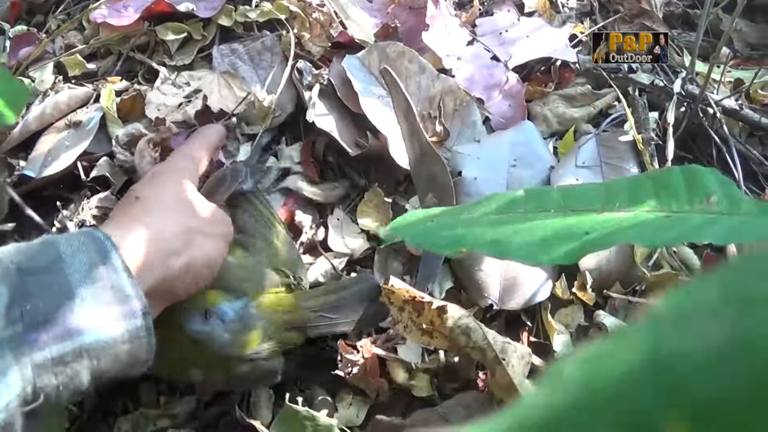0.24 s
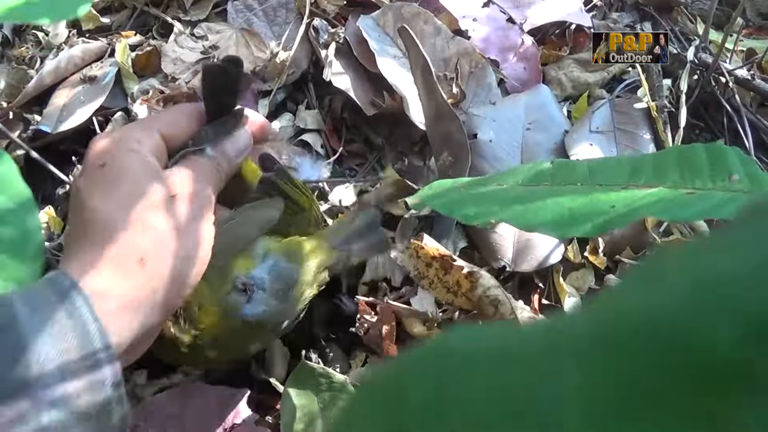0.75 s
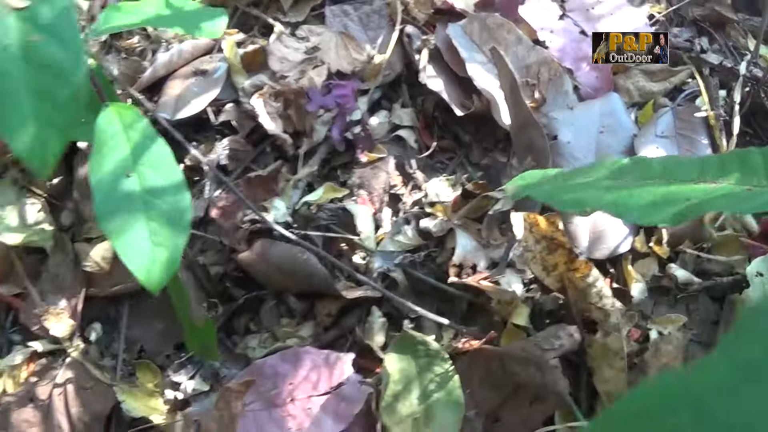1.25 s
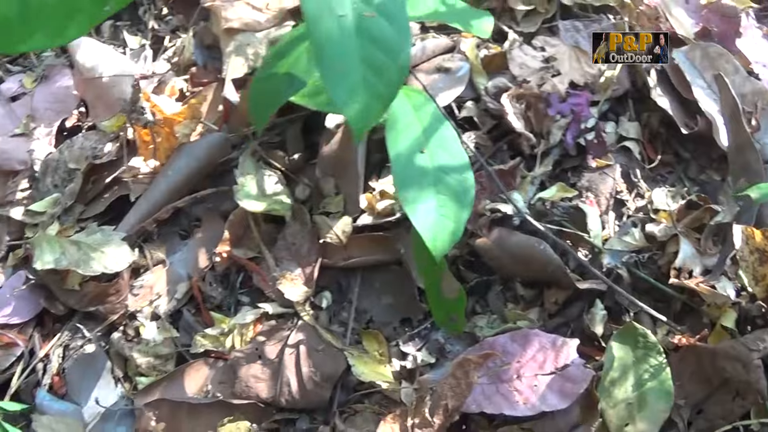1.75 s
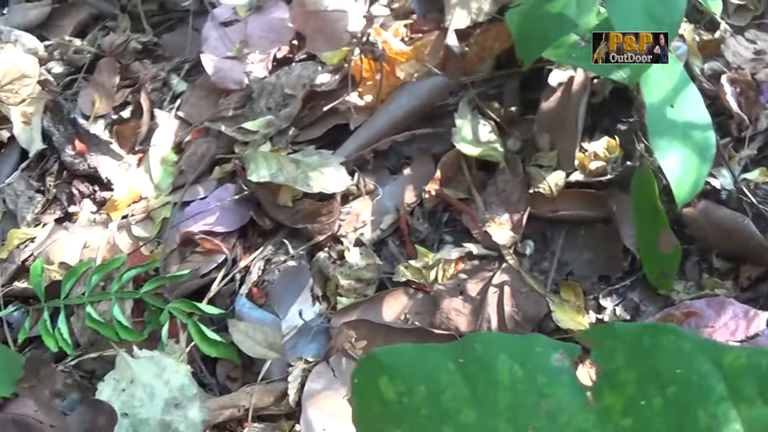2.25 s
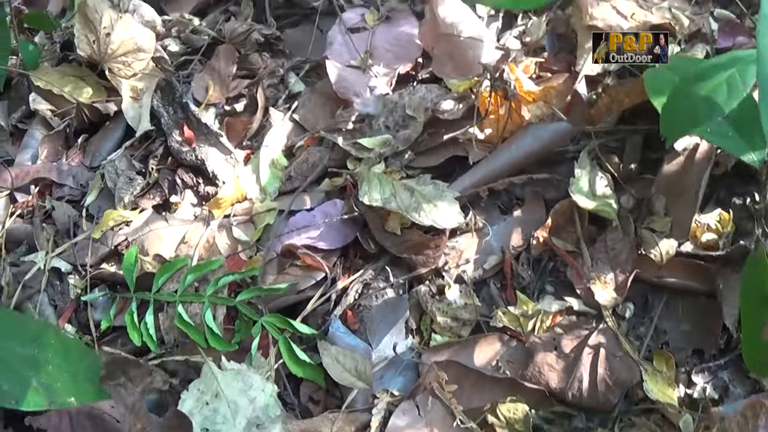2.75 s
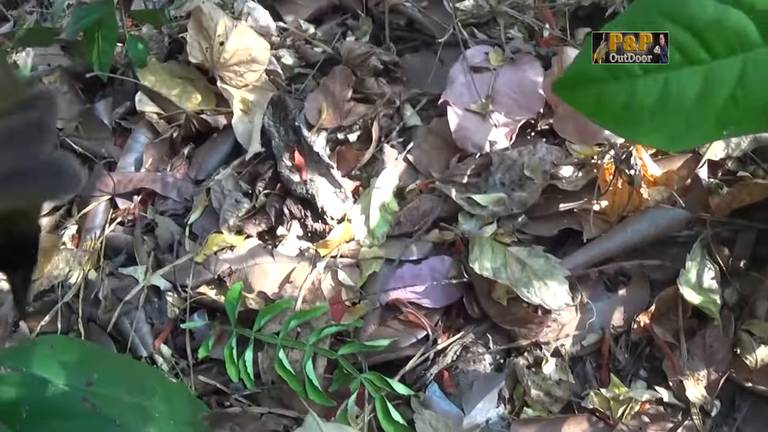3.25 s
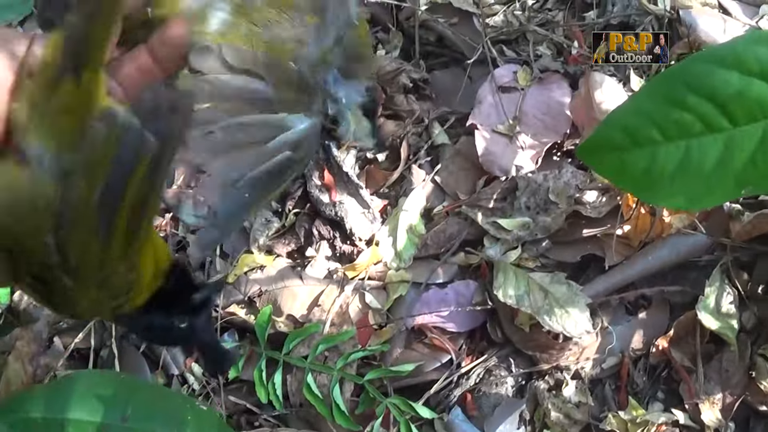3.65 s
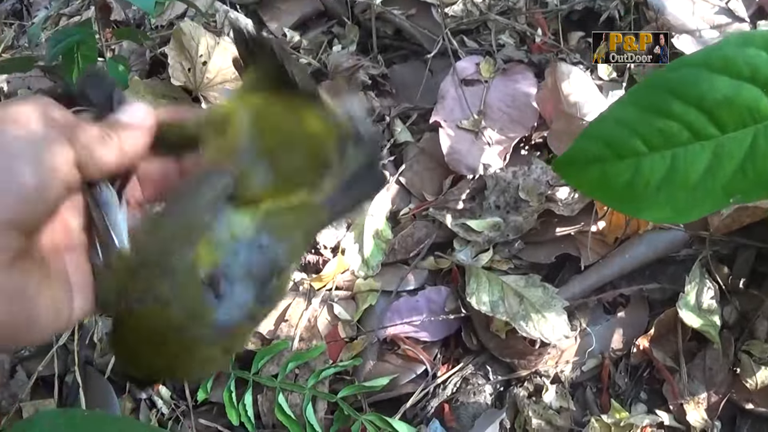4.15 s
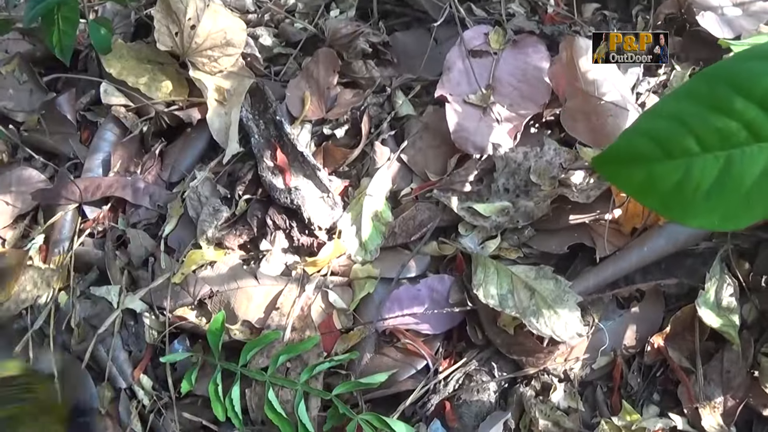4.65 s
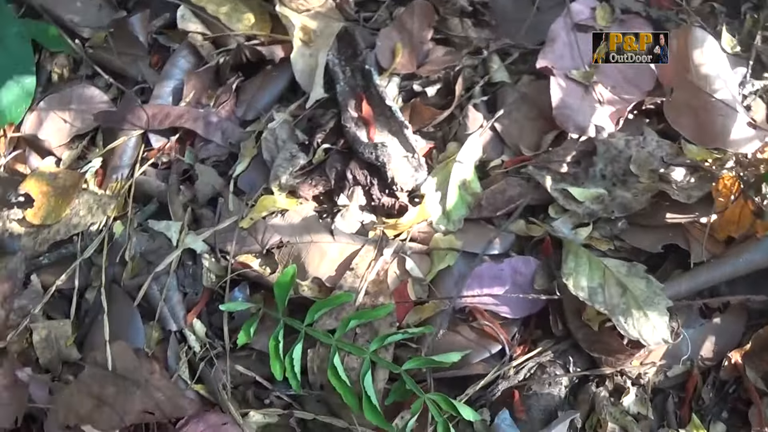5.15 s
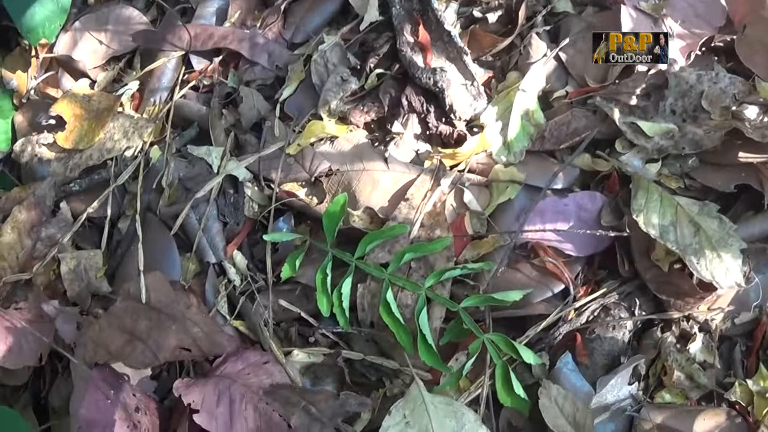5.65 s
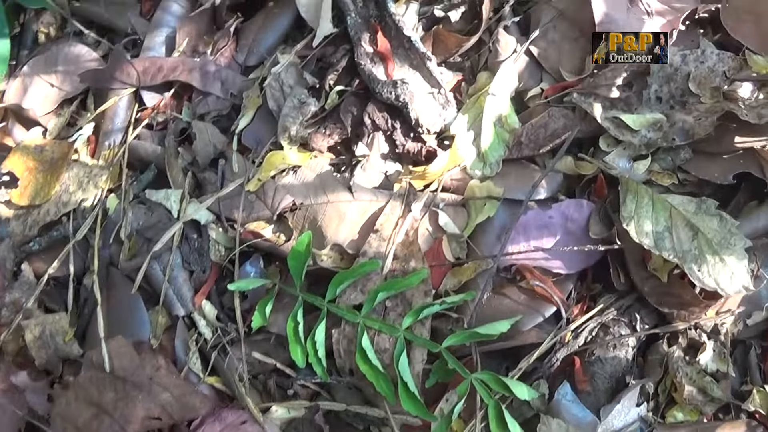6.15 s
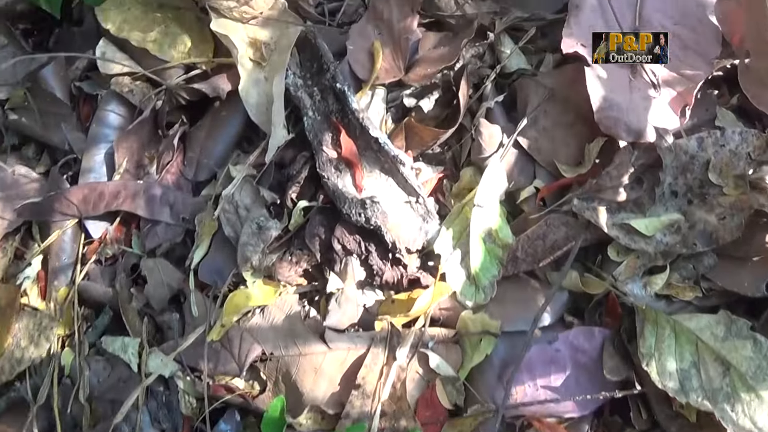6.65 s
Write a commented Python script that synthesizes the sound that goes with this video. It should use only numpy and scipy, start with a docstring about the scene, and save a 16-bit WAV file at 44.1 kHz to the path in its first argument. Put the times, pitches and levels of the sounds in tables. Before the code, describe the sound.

A close stereo microphone held low in a dry wood picks up leaf litter being disturbed. From 0 to about 1.5 seconds, coarse crackling mixes with a broad leaf dragging over the camera: low, stuttering rubs and dull, hollow knocks, strongest around 0.15, 0.7 and 1.0 seconds. The rubbing slides off by 1.6. From there to 3.3 seconds, brittle crunching continues in uneven pushes with sharp snaps and little woody flicks, leaning left at times. A short lull leads to a strong, crisp burst at 3.55 to 4.2, with bright cracks. It thins around 4.4, swells again from 4.7 to 5.5, then falls to sparse ticks, with one faint knock near 5.6 and a soft rustle around 6.4 to 6.8. A narrow, slightly fluttering cicada drone near 6 kHz persists throughout, fullest before 2.8 and fainter afterwards, over barely audible woodland air.

```python
"""Dry leaf litter crackles in bursts on a forest floor as someone moves, a camera held low among the plants.
Each push drives noise and tiny fractures through the colour of leaves; single leaves snap or flick back.
At first a broad green leaf drags over the camera, as stick-slip clicks through resonances, and knocks on it;
one faint knock comes late. Cicadas drone near 6 kHz throughout, as narrow-band noise and a wavering tone,
over the faint air of the wood, which is steady coloured noise."""
import sys
import numpy as np
from scipy import signal
from scipy.fft import rfft, irfft
from scipy.io import wavfile
from scipy.ndimage import uniform_filter1d, minimum_filter1d

SR = 44100
rng = np.random.default_rng(int(sys.argv[2]) if len(sys.argv) > 2 else 0)


def to_wav(sig):
    """Store sig (one row per channel, or 1-D mono) as 16-bit WAV at the path in sys.argv[1].

    Samples outside -1..1 are clipped; the rate is SR.
    """
    pcm = np.clip(np.atleast_2d(sig), -1, 1) * 32767
    pcm = np.round(pcm).astype(np.int16)
    wavfile.write(sys.argv[1], SR, pcm.T)  # frames by channels


N = 304290
TIME = np.arange(N) / SR  # s
BINS = np.fft.rfftfreq(N, 1 / SR)  # Hz


def gain_of(db):
    """Decibels to amplitude."""
    return 10 ** (np.asarray(db) / 20)


def evened(x):
    """Scales to rms 1."""
    return x / np.sqrt(np.mean(x ** 2) + 1e-20)


def read(points, hz=BINS):
    """Joins a table of (Hz, value) on a log-frequency axis."""
    f, value = np.transpose(points)
    return np.interp(np.log(hz + 1), np.log(f + 1), value)


def controls(rows):
    """Each column of a curve after its time column, sample by sample."""
    s, *columns = np.transpose(rows)
    return [np.interp(TIME, s, c) for c in columns]


def colour(x, gain):
    """Filters by a gain for every frequency."""
    return irfft(rfft(x) * gain, N)


def noise(spectrum):
    """Steady noise of rms 1 with the given spectrum."""
    return evened(colour(rng.standard_normal(N), gain_of(read(spectrum))))


def wander(hz):
    """Random drift of rms 1 that rolls off steeply above hz."""
    return evened(colour(rng.standard_normal(N), 1 / (1 + (BINS / hz) ** 4)))


def add(mix, s, sound):
    """Places a sound at time s."""
    part = mix[max(round(s * SR), 0):][:len(sound)]
    part += sound[:len(part)]


def clicks(per_s, spread_db, cap=4.1):
    """A random train of clicks of either sign, many small and a few large."""
    size = gain_of(spread_db * np.minimum(rng.exponential(1, N), cap))
    sign = rng.choice([-1, 1], N)
    return size * sign * (rng.random(N) < per_s / SR)


def held(x, seconds):
    """Holds the rms near 1 over the given time, keeping the finer grain."""
    power = abs(uniform_filter1d(x ** 2, int(seconds * SR)))
    return x / np.sqrt(power + 1e-9)


def resonate(x, hz, width):
    """A resonance of peak gain near 1 that follows the curve hz: shift it to zero, smooth, shift back."""
    turn = np.exp(2j * np.pi * np.cumsum(hz) / SR)
    r = np.exp(-np.pi * width / SR)
    return 2 * (turn * signal.lfilter([1 - r], [1, -r], x / turn)).real


def stroke(start, length, rise_s, sag_db_per_s, release_s):
    """The strength of one movement: a quick rise, a sagging hold, a release."""
    t = TIME - start
    rise = np.clip(t / rise_s, 0, 1)
    sag = gain_of(-sag_db_per_s * np.clip(t, 0, length))
    return rise * sag * np.exp(-np.maximum(t - length, 0) / release_s)


def strays(force_db, over_db, spread_db, count):
    """Small events at random moments, as strong as the force allows: rows (s, level dB, a draw from 0 to 1)."""
    when, size, draw = rng.random((count, 3)).T
    at = ((np.arange(count) + when) / count * (N - 1)).astype(int)
    return zip(TIME[at], force_db[at] + over_db + spread_db * (2 * size - 1), draw)


def undergrowth(x, db, decay_s):
    """The brief echo off stems and leaves nearby, as decaying noise."""
    t = np.arange(SR // 12) / SR
    echo = rng.standard_normal(len(t)) * np.exp(-t / decay_s)
    return gain_of(db) * signal.oaconvolve(x, echo / np.linalg.norm(echo))[:N]


def ports(x, scattered):
    """Direct sound that sways between the two microphone ports, and scatter that differs between them."""
    # where the crushing lies: start_s, left_over_right_db
    sway_curve = [(0.0, 0), (1.42, 1.5), (1.63, 8), (2.46, -1), (3.09, 5), (4.63, 1.5), (4.8, 8.5),
                  (5.5, 3.5), (6.9, 5)]
    # how much of the sway the ports pick up: frequency_hz, share (0 to 1)
    port_lean = [(100, 0), (380, 0), (700, 0.8), (1300, 0.5), (2400, 1), (4400, 0.66), (8000, 0.03),
                 (12000, 0.5)]
    # scattered sound in the side signal: frequency_hz, gain_db
    side_scatter = [(60, -32), (300, -16), (700, -11), (1200, -13.5), (2400, -11.5), (6000, -7.5),
                    (8500, -15.5), (11000, -23), (15000, -35)]
    sway_db, = controls(sway_curve)
    sway = np.tanh(sway_db * np.log(10) / 40)  # side over mid
    side = colour(scattered, gain_of(read(side_scatter))) + sway * colour(x, read(port_lean))
    return np.array([x + side, x - side])


def litter(force_db, crisp_db, scatter_db=-3.5):
    """Near leaves crackle grain by grain; what scatters back is a blur."""
    grains = crackle(per_s=6000, spread_db=3.0, cycles=3.6, clump_db=0.98, clump_hz=60,
                     shared=0.82, patch_db=3.5, rub=0.71)
    blur = crush(rng.standard_normal(N), force_db, crisp_db)
    return ports(crush(grains, force_db, crisp_db), gain_of(scatter_db) * blur)


def effort():
    """Force of all pushes together in dB, and their crispness averaged by power, so strong pushes set it."""
    # each push into the litter, levels before the mix of bands:
    # start_s, rise_s, length_s, force_db, crispness_db (more treble, less body)
    push_rows = [(-0.03, 0.051, 0.11, -23.5, -5.5), (0.142, 0.077, .12, -21, -3),
                 (0.318, .015, 0.035, -24.5, 1), (.37, .04, 0.077, -35, 9), (0.487, 0.013, 0.026, -28, 5),
                 (0.549, 0.095, 0.17, -28, -3), (0.773, 0.017, .04, -28, -2), (0.877, 0.048, 0.14, -30, -1),
                 (1.058, 0.11, 0.23, -26, -3.5), (1.199, 0.062, 0.14, -23, -4.5),
                 (1.377, 0.016, 0.035, -24.5, -4), (1.447, .04, 0.19, -27.5, -2),
                 (1.619, 0.039, 0.4, -24, -1), (2.053, 0.037, 0.17, -27.5, -0.5),
                 (2.182, .04, 0.19, -25.5, 2), (2.372, 0.041, 0.36, -27.5, 3),
                 (2.775, 0.062, .14, -29.5, 1.5), (2.932, 0.02, 0.36, -25.5, -.5),
                 (3.328, 0.035, 0.073, -33.5, -1.5), (3.437, 0.014, 0.15, -29, -1.5),
                 (3.551, 0.048, 0.19, -19.5, 2.5), (3.766, 0.021, 0.15, -24, 3.5),
                 (3.922, 0.029, 0.1, -22, 5.5), (4.064, .01, 0.026, -30, 5), (4.13, 0.027, .16, -27, 4.5),
                 (4.343, 0.047, 0.2, -36, 5), (4.555, 0.033, 0.24, -32.5, 1.5),
                 (4.72, 0.25, 0.23, -24, -2.5), (4.961, 0.014, .16, -25, 1), (5.14, 0.029, 0.12, -26.5, -5),
                 (5.216, 0.0097, 0.065, -22.5, 0), (5.313, .03, 0.28, -30.5, 1.5),
                 (5.643, 0.011, 0.015, -32.5, 4.5), (5.93, 0.037, 0.44, -39.5, 0),
                 (6.153, 0.058, 0.2, -34, 1), (6.391, 0.096, 0.25, -28, -1),
                 (6.684, 0.051, 0.18, -31, -0.5)]
    rest_db, rest_crisp_db = -45.5, 0.5  # the litter stirring between pushes
    sag_db_per_s = 3.5  # the leaves yield a little under a push
    settle_s, settle_per_rise = 0.035, 0.72  # then they settle, more slowly after a slow push
    uneven_db, uneven_hz = 1.45, 23  # the leaves give way in fits
    power = np.full(N, gain_of(rest_db) ** 2)
    crisp = power * rest_crisp_db
    for start, rise_s, length, db, crisp_db in push_rows:
        release_s = settle_s + settle_per_rise * rise_s
        push = (gain_of(db) * stroke(start, length, rise_s, sag_db_per_s, release_s)) ** 2
        power, crisp = power + push, crisp + push * crisp_db
    return 10 * np.log10(power) + uneven_db * wander(uneven_hz), crisp / power


def crackle(per_s, spread_db, cycles, clump_db, clump_hz, shared, patch_db, rub):
    """Tiny fractures in clumps: each gives a broad tick, or rings a flake of leaf briefly; rubbing adds noise."""
    clumps = gain_of(clump_db * wander(clump_hz))
    t, flakes = np.arange(SR // 40) / SR, np.zeros(N)
    pitches = np.geomspace(250, 15000, 36)  # Hz
    for hz in pitches:
        ring = np.exp(-t * hz / cycles) * np.sin(2 * np.pi * hz * t)
        train = clicks(per_s * (hz / pitches[-1]) ** .75 / 10, spread_db)  # small flakes outnumber large ones
        contact = gain_of(patch_db * wander(17.8))  # each flake comes into contact and slides off again
        flakes += np.sqrt(hz) * evened(contact * signal.oaconvolve(train, ring)[:N])
    ticks = clicks(per_s, spread_db, cap=3.7)
    return clumps * (evened(flakes) + shared * evened(ticks) + rub * rng.standard_normal(N))


def crush(grains, force_db, crisp_db, middle_db=-4.5, edge_db=-4.0, fizz_db=0.,
          low_hz=850, split_hz=2700, high_hz=6200, edge_share=0.41):
    """Force drives the grains; weight brings out the packed layer below, crispness the thin dry edges."""
    # colour of dry leaves before the bands are evened: frequency_hz, density_db (per Hz)
    leaf_colour = [(40, -12.5), (110, -5), (330, -0.5), (480, 0), (750, -4), (1300, -3.5), (2400, -2.5),
                   (4200, -2.5), (6500, 1), (8500, 0.5), (11500, 2.5), (13500, -2), (16000, -10.5)]
    grains = colour(grains, gain_of(read(leaf_colour)))
    low = 1 / (1 + (BINS / low_hz) ** 4)
    lower = 1 / (1 + (BINS / split_hz) ** 4)
    high = 1 - 1 / (1 + (BINS / high_hz) ** 6)
    bands = (low, lower - low, 1 - lower - high, high)
    body, middle, edge, fizz = (held(colour(grains, band), 0.062) for band in bands)
    weight_db = -13 - 1.26 * crisp_db  # the crisper a push, the less of the packed layer it moves
    mix = gain_of(middle_db - edge_share * crisp_db) * middle
    mix += gain_of(edge_db + edge_share * crisp_db) * edge
    mix += gain_of(weight_db) * body + gain_of(fizz_db + crisp_db) * fizz
    return gain_of(force_db) * mix


def snaps(force_db, level_db=-1., tail_db=13.0, split_hz=6000, crack_s=0.0001):
    """A leaf breaks with a sharp crack, then splinters for a few milliseconds."""
    # the loudest leaves snapping: start_s, level_db (before level_db is added),
    # crispness_db (treble over middle), splinter_decay_ms
    leaf_breaks = [(0.1471, -17.5, -3, 3.6), (0.826, -22, 17, 3.2), (1.5203, -11, 19, 1.2),
                   (1.5746, -15.5, -9, 8), (1.62, -15, 8, 4.2), (1.88, -17, 11, 2.2), (1.8934, -13, 8, 2.4),
                   (2.0717, -17, 6, 5), (2.2392, -16, -4, 2), (2.263, -11, -3, 0.99),
                   (2.3182, -12.5, 3, 12), (2.5292, -13, 14, 1.4), (2.5724, -15.5, 5, 2.5),
                   (2.677, -14.5, 6, 3.5), (2.695, -13, 6, 2.7), (2.7838, -7.5, 29, 1.1),
                   (2.8726, -16, 21, 1.7), (3.0399, -21, -9, 1.5), (3.085, -23, -5, 3), (3.4546, -22, 7, 5),
                   (3.827, -12, 1, 4.5), (3.8594, -11, 25, 11), (3.8728, -10, 6, 5), (4.068, -8, 21, 1.1),
                   (4.087, -10, 8, 1.4), (4.1626, -10.5, 23, 3), (4.1837, -14.5, 1, 1.9),
                   (4.3485, -17, 1, 3.2), (4.3898, -17, 13, 0.74), (4.411, -17, 19, 2.7),
                   (4.4576, -20, 4, 2.7), (4.5218, -19, 1, 3.2), (4.5718, -14.5, 8.5, 5.5),
                   (4.5808, -9, 17, 0.53), (4.6173, -19, 10.5, 1.4), (4.993, -13, -6, 3.2),
                   (5.222, -12.5, -4, 4.4), (5.2779, -11, 2, 5.2), (5.3348, -14.5, 5, 8.8),
                   (5.4258, -20, 9, 2), (5.4925, -21, 16, 6), (5.515, -14, 23, 1.6), (5.5407, -17, 16, 1.4),
                   (5.5837, -13, 7, 0.81), (5.609, -17.5, 21, 2.2), (5.7003, -20.5, 21, 4),
                   (5.786, -23.5, 14, 2.3), (5.993, -23, -45, 2.9), (6.079, -25, 3, 2.2),
                   (6.189, -22, 4, 5.5), (6.2514, -20.5, 5, 1.3), (6.325, -21, 14, 1.9),
                   (6.35, -19, 5, 3.4), (6.6732, -14.5, 3, 1.4)]
    out, t = np.zeros(N), np.arange(2048) / SR
    dull = signal.butter(2, [900, split_hz], "bandpass", fs=SR, output="sos")
    crisp = signal.butter(2, [split_hz, 13000], "bandpass", fs=SR, output="sos")
    for s, db, crisp_db, ms in leaf_breaks + small_snaps(force_db):
        shape = np.exp(-t / crack_s) + gain_of(tail_db) * np.exp(-t * 1000 / ms)
        a, b = rng.choice([-1, 1], (2, len(t))) * shape
        treble = evened(signal.sosfilt(crisp, b))
        crack = evened(signal.sosfilt(dull, a)) + gain_of(crisp_db) * treble
        first_3_ms = crack[:SR * 3 // 1000]  # the level is that of the onset
        add(out, s, gain_of(db + level_db) * crack / np.std(first_3_ms))
    return ports(out, undergrowth(out, db=-16.0, decay_s=.004))


def small_snaps(force_db, dull_db=-12.0, crisp_db=13.0, ms=2.4):
    """Lesser leaves break all through, as loud as the force allows, some dull and some crisp."""
    events = strays(force_db, over_db=2.5, spread_db=2.0, count=48)
    return [(s, db, dull_db + u * (crisp_db - dull_db), ms) for s, db, u in events]


def flicks(force_db, level_db=-2.0, ring_s=0.0015, rise_s=0.00029, rasp=0.43, tap_db=-8.0, tap_s=0.0003,
           lowest_hz=350):
    """A released leaf or twig taps its neighbour and rings in its main bending mode, with a little rasp."""
    # the loudest stiff leaves and twigs flicking back:
    # start_s, ring_db (before level_db is added), pitch_hz
    releases = [(0.276, -10, 2920), (0.7157, -10, 3970), (1.2826, -6.5, 1670), (1.3467, -9, 2400),
                (1.5867, -7.5, 1550), (1.8186, -9, 2800), (1.8786, -8.5, 2000), (2.108, -16, 3400),
                (2.1379, -15, 3540), (2.2378, -10, 3800), (2.454, -8, 3700), (3.04, -10, 1040),
                (3.094, -11, 1990), (3.1825, -14, 2760), (3.1908, -13, 2000), (3.5936, -8, 2710),
                (3.7214, -7.5, 1150), (3.9819, -9.5, 3250), (4.821, -11.5, 2020), (5.116, -13.5, 1770),
                (5.2702, -11, 3420), (6.4906, -17, 4700), (6.548, -13, 5040), (6.5957, -13.5, 3300),
                (6.648, -14, 4360)]
    out, t = np.zeros(N), np.arange(1024) / SR
    shape = (1 - np.exp(-t / rise_s)) * np.exp(-t / ring_s)
    for s, db, hz in releases + small_flicks(force_db):
        scrape = evened(signal.lfilter([1], [1, -.7], rng.standard_normal(len(t))))
        ring = shape / shape.max() * (np.sin(2 * np.pi * hz * t) + rasp * scrape)
        tap = gain_of(tap_db) * np.exp(-t / tap_s) * scrape
        add(out, s, gain_of(db + level_db) * (ring + tap))
    no_bass = signal.butter(2, lowest_hz, "highpass", fs=SR, output="sos")  # too small to radiate bass
    out = signal.sosfilt(no_bass, out)
    return ports(out, undergrowth(out, db=-4.0, decay_s=.006))


def small_flicks(force_db, low_hz=800., high_hz=4500.):
    """Lesser leaves of all sizes spring back."""
    events = strays(force_db, over_db=8., spread_db=6.5, count=48)
    return [(s, db, low_hz * (high_hz / low_hz) ** u) for s, db, u in events]


def dragging_leaf(drag_db=-1.5, ring_db=-8.0, knock_db=-6.5):
    """The leaf sticks and slips on the casing and knocks on it; the ports hear the shaking out of step."""
    # colour of the shaken casing, before its level is held: frequency_hz, density_db (per Hz)
    casing_colour = [(25, -22), (70, -7.5), (130, -3.5), (175, -4), (250, 1.5), (440, 0.5), (560, -6.5),
                     (790, -6), (1050, -13.5), (2300, -21), (5000, -39)]
    # how far the left port leads, held at 2 rad at most: frequency_hz, lead_rad
    casing_lead = [(30, .2), (120, 0.59), (220, .85), (430, 1.33), (1000, 1.9), (2500, 2.3)]
    # the leaf knocking on the camera: start_s, level_db (before knock_db is added), pitch_hz, decay_ms
    leaf_knocks = [(0.131, -15, 205, 23), (0.151, -2, 450, 5.9), (0.255, -8.5, 264.7, 29),
                   (0.652, -9.5, 250.5, 44), (0.716, -10, 141, 25), (0.797, -7, 384, 7.2),
                   (0.942, -11.5, 403, 5.7), (0.972, -15, 360, 9.5), (0.998, -2.5, 460, 3.3),
                   (0.9985, -8, 830, 4.1), (1.155, -20, 227, 30), (1.403, -11.5, 198, 20),
                   (1.411, -5, 440, 1.5), (5.626, -19, 493, 2.5)]
    pressure_db, hz = drags()
    slips = evened(clicks(per_s=1100, spread_db=2.5))
    casing = held(colour(slips, gain_of(read(casing_colour))), 0.096)
    blade = held(resonate(resonate(slips, hz, width=44), hz, width=100), 0.068)
    contact = np.interp(TIME, [1.42, 1.6], [1, 0])  # the leaf slides off
    rubbing = held(casing + gain_of(ring_db) * blade, 0.0234)
    out = gain_of(pressure_db + drag_db) * rubbing * contact
    t = np.arange(SR // 5) / SR
    for s, db, pitch, decay in leaf_knocks:
        rise = 0.13 * decay  # a softer knock both starts and dies more slowly
        shape = (1 - np.exp(-1000 * t / rise)) ** 2 * np.exp(-1000 * t / decay)
        add(out, s, gain_of(db + knock_db) * shape / shape.max() * np.sin(2 * np.pi * pitch * t))
    lead = np.clip(read(casing_lead), 0, 2)
    side = colour(out, 1j * np.tan(lead / 2)) + undergrowth(out, db=-24.0, decay_s=0.013)
    return np.array([out + side, out - side])


def drags():
    """Pressure of the leaf on the camera in dB, and its resonance in Hz, which glides during each drag."""
    # each drag over the camera: start_s, length_s, pressure_db (before drag_db is added),
    # resonance_start_hz, resonance_end_hz
    drag_rows = [(-0.02, 0.18, -23, 210, 260), (0.106, 0.091, -14.5, 270, 250), (0.197, 0.1, -18, 232, 275),
                 (0.31, 0.11, -35, 285, 270), (0.626, 0.049, -17, 250, 250), (0.686, 0.13, -20.5, 290, 390),
                 (0.829, 0.097, -24.5, 314, 333), (0.933, 0.052, -19, 367, 350),
                 (1.144, 0.26, -37, 222, 300), (1.382, 0.08, -28, 220, 250), (1.487, 0.045, -31, 300, 330)]
    rise_s, sag_db_per_s, release_s, rest_db = 0.02, 6, 0.017, -40.5
    power, glide = gain_of(rest_db) ** 2, []
    for start, length, db, from_hz, to_hz in drag_rows:
        power = power + (gain_of(db) * stroke(start, length, rise_s, sag_db_per_s, release_s)) ** 2
        glide += [(start, from_hz), (start + length, to_hz)]
    return 10 * np.log10(power), controls(sorted(glide))[0]


def cicadas(level_db=-0.72, near_db=-11.0, side_db=-11.0, flutter_db=0.62, waver_hz=170, lean=0.044):
    """Many distant insects blur into one narrow band; a nearer one wavers at its centre."""
    # the chorus over time: start_s, level_db (before level_db is added)
    chorus_curve = [(0, -25), (.2, -26.5), (.4, -23), (1.4, -22), (1.55, -20.5), (1.7, -21.5), (2.4, -22),
                    (2.74, -20.5), (2.8, -24.5), (3.4, -26.5), (5.1, -27.5), (5.8, -29), (6.9, -28.5)]
    # colour of the blurred song: frequency_hz, density_db (per Hz)
    song_colour = [(3800, -62), (4850, -9.5), (5250, -7), (5550, 2.5), (5850, 6.5), (6080, 6), (6350, 3),
                   (6750, -2.5), (7500, -12.5), (10000, -32), (12000, -60), (13500, -75)]
    # brief lifts of the pitch: peak_s, rise_hz
    pitch_lifts = [(0.919, 299.8), (1.769, 159.8), (2.06, 240.2)]
    centre_hz, lift_s = 6150, 0.068  # the nearer insect's pitch, and the time a lift takes to fall to 1/e
    level, = controls(chorus_curve)
    hz = centre_hz + sum(rise_hz * np.exp(-((TIME - s) / lift_s) ** 2) for s, rise_hz in pitch_lifts)
    turn = np.exp(2j * np.pi * np.cumsum(hz - hz.mean()) / SR)  # shifts the band along with the lifts
    mid, side = ((signal.hilbert(noise(song_colour)) * turn).real for _ in range(2))
    tone = np.sin(2 * np.pi * np.cumsum(hz + waver_hz * wander(129)) / SR)
    near = evened(gain_of(3.7 * wander(120)) * tone)
    mid = mid + gain_of(near_db) * near
    side = gain_of(side_db) * side + lean * mid
    return gain_of(level + level_db + flutter_db * wander(47)) * np.array([mid + side, mid - side])


def forest(level_db=-46.5, side_db=-9.0):
    """Faint even air of the wood, as steady noise."""
    # colour of the air: frequency_hz, density_db (per Hz, relative)
    air_colour = [(25, -3), (90, 8.5), (200, 8.5), (480, 6), (750, -21), (1700, -15), (2700, 11),
                  (4200, -7.5), (9000, -31.5), (16000, 6)]
    mid, side = noise(air_colour), gain_of(side_db) * noise(air_colour)
    return gain_of(level_db) * np.array([mid + side, mid - side])


def scene():
    """Everything at the two ports, the litter, snaps and flicks sharing one effort."""
    force_db, crisp_db = effort()
    leaves = litter(force_db, crisp_db) + snaps(force_db) + flicks(force_db)
    return leaves + dragging_leaf() + cicadas() + forest()


def limited(x, recovery_db_per_s=160):
    """A limiter: the gain drops just ahead of any peak above full scale and creeps back."""
    over_db = np.maximum(20 * np.log10(abs(x).max(0) + 1e-9), 0)
    fall = TIME * recovery_db_per_s
    gain_db = minimum_filter1d(fall - np.maximum.accumulate(over_db + fall), size=41)
    return x * gain_of(uniform_filter1d(gain_db, size=41))


def record(dry):
    """The top treble is near mono; a limiter catches peaks above full scale; then a 16 kHz band limit."""
    # the difference that the camera keeps between its ports: frequency_hz, gain_db
    port_spacing = [(25, -7), (100, -1.5), (7000, 2.5), (9800, 7.5), (11000, -11), (15000, -31)]
    mid = dry.mean(0)
    side = colour((dry[0] - dry[1]) / 2, gain_of(read(port_spacing)))
    band_limit = signal.firwin(511, 16000, window=("kaiser", 9), fs=SR)
    return signal.oaconvolve(limited(np.array([mid + side, mid - side])), band_limit[None], "same")


dry = scene()
out = record(dry)
to_wav(out)
```